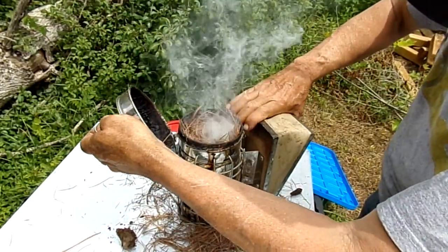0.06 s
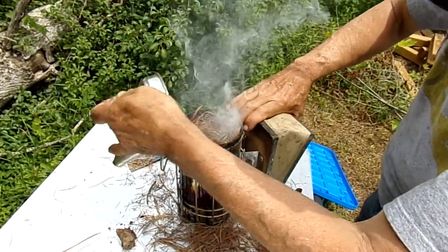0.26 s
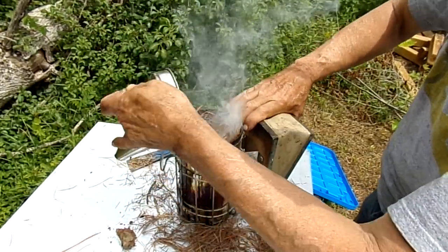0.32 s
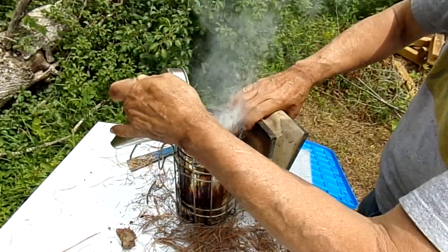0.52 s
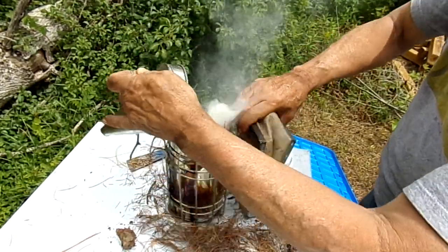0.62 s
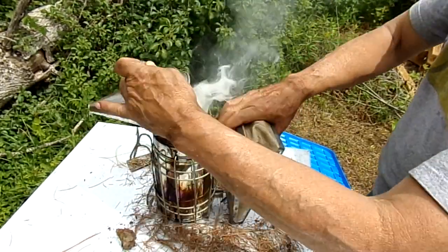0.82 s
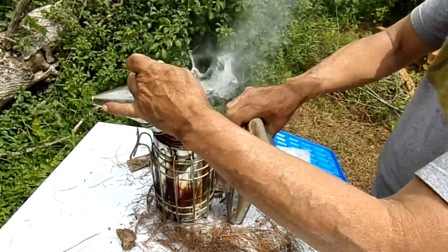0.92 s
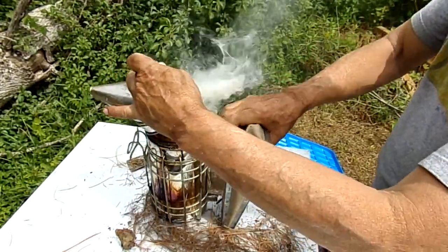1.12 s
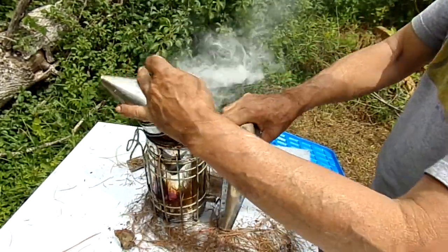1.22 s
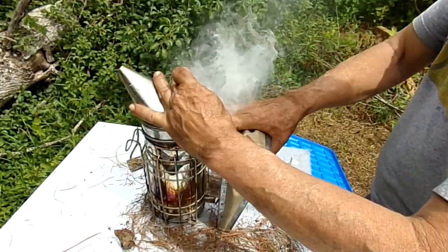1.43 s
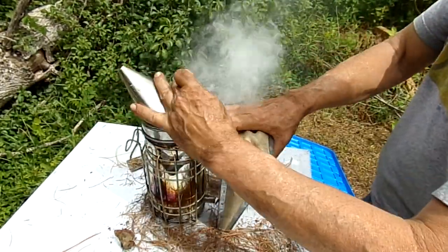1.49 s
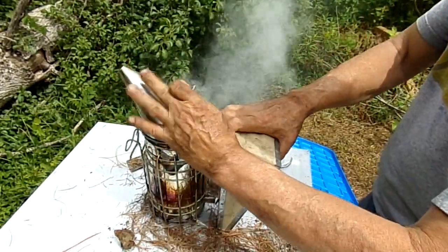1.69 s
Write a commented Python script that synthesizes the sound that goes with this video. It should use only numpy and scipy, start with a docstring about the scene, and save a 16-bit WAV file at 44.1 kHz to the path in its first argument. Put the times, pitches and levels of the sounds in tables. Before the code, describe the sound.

A hand bellows puffs three breathy bursts through a metal fire pot, drawing air back between them; a tin lid scrapes and clanks first, small ticks follow, close microphone, quiet yard with faint birds.

```python
"""A bee smoker is worked on a yard table. Filtered noise makes the hush of the yard, where gliding tones
chirp as small far birds; the hinge ticks as the lid is tilted, and the tin lid scrapes and clanks as
noise bursts over decaying modes. The hand bellows flaps softly in struck low tones, draws air back in
as gated noise, and between these breaths blows three puffs of resonant noise through the fire pot.
Late on, its air valve squeaks shut in a falling whistle."""
import sys
import numpy as np
from scipy.fft import rfft, irfft, next_fast_len
from scipy.io import wavfile
from scipy.ndimage import map_coordinates

SR = 44100
rng = np.random.default_rng(int(sys.argv[2]) if len(sys.argv) > 2 else 0)


def master_out(mix):
    """Clip the mix to full scale and print it as 16-bit PCM to the path in sys.argv[1]."""
    frames = np.transpose(np.atleast_2d(mix))
    ceiling = np.clip(frames, -1, 1)
    pcm = np.round(ceiling * 32767).astype(np.int16)
    wavfile.write(sys.argv[1], SR, pcm)


N = 77175  # samples, 1.75 s


def amp(db):
    """Logarithmic level: decibels to amplitude gain."""
    return 10 ** (np.asarray(db) / 20)


def unit(x):
    """Normalisation: scales the signal to rms 1."""
    return x / np.sqrt(np.mean(x ** 2) + 1e-20)


def since(start):
    """Causality: seconds elapsed since start, zero before it."""
    return np.maximum(np.arange(N) / SR - start, 0)


def filtered(x, response):
    """Linear filtering: multiplies the spectrum by a response of frequency."""
    size = next_fast_len(N + SR // 2)  # padded against wrap-around
    spectrum = rfft(x, size) * response(np.fft.rfftfreq(size, 1 / SR))
    return irfft(spectrum, size)[:N]


def coloured(x, points):
    """Spectral shaping: a curve through (Hz, dB) points on a log frequency axis, then rms 1."""
    f, db = np.transpose(points)
    return unit(filtered(x, lambda hz: amp(np.interp(np.log(hz + 1), np.log(f + 1), db))))


def noise(points):
    """Turbulence: fresh random noise of the given colour."""
    return coloured(rng.standard_normal(N), points)


def resonant(modes):
    """Cavity resonance: noise through squared second-order peaks (Hz, width in Hz at -6 dB, dB)."""
    def response(f):
        peaks = [amp(db) * abs(f * width / (centre * centre - f * f + 1j * f * width)) ** 2
                 for centre, width, db in modes]
        return sum(peaks)
    return unit(filtered(rng.standard_normal(N), response))


def wobble(rate):
    """Random modulation: a smooth curve through normal knots, rate of them a second."""
    return map_coordinates(rng.standard_normal(N // 10), [np.arange(N) * rate / SR], mode="wrap")


def swell(on, off, rise, fall):
    """Flow inertia: air builds and dies away smoothly, each edge at half strength at on and off."""
    t = np.arange(N) / SR
    opening = (1 + np.tanh((t - on) / rise / 2)) / 2
    closing = (1 - np.tanh((t - off) / fall / 2)) / 2
    return opening * closing


def struck(start, attack, t60):
    """Damped impact: quick attack and exponential decay, 60 dB in t60 seconds."""
    t = since(start)
    return (1 - np.exp(-t / attack)) * np.exp(-np.log(1000) * t / t60)


def tone(start, hz, attack, t60):
    """Modal vibration: one struck sine, slightly rough through random phase."""
    mode_rough = 0.45  # radians at each knot
    phase = 2 * np.pi * hz * since(start) + mode_rough * wobble(150)
    return struck(start, attack, t60) * np.sin(phase)


def glide(start, length, from_hz, to_hz, db, waver):
    """Frequency modulation: a short, slightly unsteady whistle on a straight pitch path."""
    u = np.minimum(since(start) / length, 1)
    hz = (from_hz + (to_hz - from_hz) * u) * (1 + waver * wobble(400))
    envelope = np.sqrt(2 * abs(np.sin(np.pi * u)))
    return amp(db) * envelope * np.sin(2 * np.pi * np.cumsum(hz) / SR)


def low_cut(x):
    """Radiation efficiency: small parts radiate almost no deep bass."""
    low_cut_hz = 150
    return filtered(x, lambda hz: 1 - 1 / (1 + (hz / low_cut_hz) ** 6))


# Spectrum of the yard's hush. Each row: frequency in Hz, level in dB.
YARD_SPECTRUM = [(25, -42), (70, -18), (110, -14.5), (170, -2), (330, -1.5), (600, -8), (1000, -14),
                 (1250, -7), (2100, -12), (3800, -13.5), (5300, -9.5), (8000, -28), (10500, -20.5),
                 (13200, -17.5), (15500, -34)]
# Notes of the far birds. Each row: start in seconds, length in seconds, first pitch in Hz,
# last pitch in Hz, level in dB before the flutter.
BIRD_NOTES = [(.08, 0.018, 5450, 5400, -53), (.112, .02, 5450, 5300, -51.5),
              (0.148, 0.022, 5500, 5350, -50.5), (0.319, 0.016, 5400, 5480, -49.5),
              (0.355, 0.045, 3250, 2930, -50.5), (.384, 0.014, 5500, 5400, -49.5),
              (.772, .016, 5480, 5420, -47.5), (1.466, .016, 6100, 5850, -54),
              (1.502, 0.024, 6150, 5300, -54), (1.536, 0.026, 6250, 5400, -53.5)]
YARD_DB, YARD_SWAY_DB, CHIRP_FLUTTER_DB = -49.5, .8, 3


def yard():
    """Ambient field and scattering: a swaying hush, and far birds' notes broken by the foliage."""
    hush = amp(YARD_DB + YARD_SWAY_DB * wobble(11.6)) * noise(YARD_SPECTRUM)
    birds = sum(glide(*row, waver=0.02) for row in BIRD_NOTES)
    flutter = amp(CHIRP_FLUTTER_DB * np.tanh(wobble(200)))
    return hush + birds * flutter


# Spectrum of a bright metal click, also heard in the lid. Each row: frequency in Hz, level in dB.
CLICK_SPECTRUM = [(1000, -25), (5000, -6.5), (8500, -19), (11000, -5.5), (13000, -3), (15500, -18.5)]
# Slips of the hinge. Each row: start in seconds, level in dB.
HINGE_SLIPS = [(.131, -37), (.437, -37), (1.265, -33), (1.431, -25.5), (1.4882, -25.5), (1.73, -40)]
HINGE_HZ, HINGE_DB = 12840, 1  # the hinge's own ring, dB relative to the slip
TICK_ATTACK_S, TICK_T60_S = 0.00071, 0.0095


def ticks():
    """Stick-slip: each slip of the hinge gives a bright click and a very short ring."""
    bright = noise(CLICK_SPECTRUM)
    out = np.zeros(N)
    for start, db in HINGE_SLIPS:
        click = bright * struck(start, TICK_ATTACK_S, TICK_T60_S)
        hinge = amp(HINGE_DB) * tone(start, HINGE_HZ, TICK_ATTACK_S, TICK_T60_S)
        out += amp(db) * (click + hinge)
    return out


CONTACT_S = 0.0011  # attack of a tin contact
# Modes of the tin. Each row: frequency in Hz, level in dB, 60 dB decay time in seconds.
TIN_MODES = [(1206, -1, .05), (1560, -5, .035), (2540, -9, .03), (3198, -7, .05), (5416, -11, .035)]


def ring(start):
    """Modal superposition: the tin's modes, in a new random balance at every blow."""
    return sum(amp(db + rng.normal(0, 1.5)) * tone(start, hz, CONTACT_S, t60)
               for hz, db, t60 in TIN_MODES)


# Spectrum of the tin's scrape. Each row: frequency in Hz, level in dB.
SCRAPE_SPECTRUM = [(100, 6), (300, 11), (700, -4.5), (1300, -3), (1900, -0.5), (2600, -0.5), (3900, -10),
                   (5500, -11), (8000, -18), (15000, -19)]
# Knocks of the tin lid and pot. Each row: start in seconds, level in dB, bright part in dB
# relative to that level, 60 dB decay time in seconds.
TIN_KNOCKS = [(0.2134, -25.5, -10, 0.02), (0.2198, -29.5, -4.5, 0.033), (0.2253, -20, -12, 0.019),
              (0.2346, -24, 0, 0.03), (0.2409, -18, 3.5, 0.021), (0.2458, -28.5, -6.5, 0.11),
              (0.605, -24.5, 10.5, 0.015), (0.792, -33, 6.5, 0.026), (0.952, -29, -5, 0.042),
              (1.044, -41, 8.5, 0.086), (1.0751, -29.5, 7, 0.031), (1.168, -28.5, -21, 0.027),
              (1.6791, -29.5, -2.5, 0.014), (1.6835, -30.5, -5, 0.011), (1.713, -43, -1, 0.12)]
# Short notes where the tin catches and clacks. Each row: start in seconds, pitch in Hz, level in dB.
TIN_CLACKS = [(.2255, 1150, -23), (.2345, 2560, -12), (.236, 5300, -19), (.517, 1240, -17.5),
              (.5175, 1650, -16.5)]
RING_DB, GRIT_DB = -7.5, 5  # ring relative to its knock; greatest swing of the grit either way
CLANK_S, CLANK_WIDTH_S = .2444, .0010  # centre and 1/e half-width of the clank
CLANK_DB, CLANK_RING_DB = -19.5, -22  # the rim hits home: its crack and its ring
CLACK_ATTACK_S, CLACK_T60_S = .004, .03


def lid():
    """Friction and impact: short gritty scrapes ring the hand-damped tin, which clacks where it catches."""
    grit = amp(GRIT_DB * np.tanh(wobble(1200)))
    body = unit(noise(SCRAPE_SPECTRUM) * grit)
    bright = noise(CLICK_SPECTRUM)
    crack = np.exp(-((since(0) - CLANK_S) / CLANK_WIDTH_S) ** 2) * bright
    out = amp(CLANK_DB) * crack + amp(CLANK_RING_DB) * ring(CLANK_S)
    for start, db, treble_db, t60 in TIN_KNOCKS:
        scrape = struck(start, CONTACT_S, t60) * (body + amp(treble_db) * bright)
        out += amp(db) * (scrape + amp(RING_DB) * ring(start))
    for start, hz, db in TIN_CLACKS:
        out += amp(db) * tone(start, hz, CLACK_ATTACK_S, CLACK_T60_S)
    return out


# Flaps of the bellows' folds. Each row: start in seconds, pitch in Hz, level in dB,
# 60 dB decay time in seconds.
FOLD_FLAPS = [(0.2449, 275, -14, 0.023), (0.244, 165.3, -15.5, 0.11), (.583, 233, -28, 0.22),
              (0.611, 159, -30, 0.13), (0.674, 169, -28, 0.12), (0.921, 176, -30, 0.13),
              (0.953, 179, -28, 0.11), (1.045, 217, -26, 0.08), (1.164, 158.3, -21, 0.085),
              (1.286, 206, -34, 0.083), (1.354, 209, -34, 0.083), (1.632, 187, -30.5, 0.065)]
FLAP_ATTACK_S = 0.0028


def flaps():
    """Membrane vibration: the folds of the bellows flap in soft, low, damped thumps."""
    return sum(amp(db) * tone(start, hz, FLAP_ATTACK_S, t60) for start, hz, db, t60 in FOLD_FLAPS)


# Spectrum of the air rushing in. Each row: frequency in Hz, level in dB.
INTAKE_SPECTRUM = [(76, -55), (130, -3.5), (330, -1), (1060, -6.5), (1310, 0.5), (3320, -9.5),
                   (3680, -13.5), (4160, -9), (6730, -16.5), (8000, -25), (10400, -67)]
# Spectrum of the valve's hiss, also the colour of the crackle. Each row: frequency in Hz, level in dB.
HISS_SPECTRUM = [(4000, -26), (6500, -5), (8300, -21), (10300, 1.5), (11700, -5), (13000, 3), (15500, -16)]
# Breaths drawn back in. Each row: half up in seconds, half down in seconds, rush in dB, hiss in dB.
BREATHS = [(0.37, 0.466, -43.5, -56.5), (0.476, 0.505, -36.5, -39.5), (0.66, 0.748, -38.5, -37),
           (0.784, 0.81, -35, -41.5), (0.934, 1.092, -42, -40), (1.232, 1.32, -55.5, -44.5),
           (1.165, 1.48, -50, -53.5)]
INTAKE_RISE_S, INTAKE_FALL_S = 0.011, 0.014


def intakes():
    """Turbulent inflow: the bellows refills with a softer rush and a thin hiss at the valve."""
    rush = noise(INTAKE_SPECTRUM) * amp(1.4 * wobble(59.97))
    hiss = noise(HISS_SPECTRUM) * amp(1.2 * wobble(150))
    out = np.zeros(N)
    for on, off, rush_db, hiss_db in BREATHS:
        flow = swell(on, off, INTAKE_RISE_S, INTAKE_FALL_S)
        out += flow * (amp(rush_db) * rush + amp(hiss_db) * hiss)
    return out


# Spectrum of the blown air. Each row: frequency in Hz, level in dB.
PUFF_SPECTRUM = [(71, -57), (120, -21), (212, -13), (367, 0.5), (552, -14.5), (846, -9.5), (917, -18.5),
                 (1590, -5), (2290, -8), (3300, -8), (3660, -7), (4670, -9), (8080, -19), (12900, -9),
                 (15500, -33)]
# Air modes of the fire pot. Each row: frequency in Hz, width in Hz at -6 dB, level in dB.
POT_MODES = [(808, 270, -4), (1250, 170, -1), (1614, 110, 3), (2516, 47, -4.5), (3320, 124, -3.5),
             (4040, 780, -9.5)]
# Squeezes of the bellows. Each row: half up in seconds, half down in seconds, rise in seconds,
# fall in seconds, level in dB, boom pitch in Hz, boom level in dB.
SQUEEZES = [(0.515, 0.625, .014, 0.021, -27, 230, -40), (0.827, 0.916, 0.0088, 0.011, -27, 354, -35.5),
            (1.106, 1.164, 0.013, 0.02, -28, 307, -39.5)]
# The nozzle singing in the second puff. One row: start in seconds, length in seconds,
# first pitch in Hz, last pitch in Hz, level in dB.
NOZZLE_WHISTLE = (.852, .08, 830, 890, -37)
POT_DB, BOOM_WIDTH_HZ = -6, 91
TREBLE_GROWS = 1.46  # exponent of flow for the treble
FLUTTER_DB, GUST_DB = 0.66, 1.8  # dB per unit of wobble; the body flutters more than its hiss
CRACKLE_PER_S, CRACKLE_DB = 470, -6  # dry fuel in the draught, dB relative to the puff


def puffs():
    """Turbulence and resonance: air rushes through fuel, brighter with flow, sounding pot and bellows."""
    air = low_cut(noise(PUFF_SPECTRUM))
    low = filtered(air, lambda hz: 1 / (1 + (hz / 3500) ** 2))
    treble = air - low
    pot = amp(POT_DB) * resonant(POT_MODES)
    gusts = amp(GUST_DB * wobble(110))
    snaps = (rng.random(N) < CRACKLE_PER_S / SR) * rng.standard_normal(N)
    crackle = amp(CRACKLE_DB) * coloured(snaps, HISS_SPECTRUM)
    out = np.zeros(N)
    for on, off, rise, fall, db, boom_hz, boom_db in SQUEEZES:
        flow = swell(on, off, rise, fall)
        body = flow * (gusts * (low + pot) + crackle)
        out += amp(db) * (body + flow ** TREBLE_GROWS * treble)
        out += amp(boom_db) * flow * resonant([(boom_hz, BOOM_WIDTH_HZ, 0)])
    return out * amp(FLUTTER_DB * wobble(130)) + glide(*NOZZLE_WHISTLE, waver=0.0048)


# Path of the squeak as the air valve shuts. Each row: time in seconds, pitch in Hz,
# level in dB, both before random wavering.
VALVE_SQUEAK = [(1.284, 13550, -52), (1.315, 13000, -39.5), (1.336, 12150, -58), (1.356, 10400, -48),
                (1.386, 8950, -62)]


def squeak():
    """Frequency modulation: a thin, wavering, falling whistle as the air valve shuts."""
    t = np.arange(N) / SR
    times, hz, db = np.transpose(VALVE_SQUEAK)
    pitch = np.interp(t, times, hz) * (1 + .007 * wobble(600))
    level = amp(np.interp(t, times, db) + 2.5 * wobble(200))
    sounding = (t > times[0]) * (t < times[-1])
    return sounding * level * np.sin(2 * np.pi * np.cumsum(pitch) / SR)


def scene():
    """Superposition: the smoker close by, the yard behind."""
    metal_and_folds = low_cut(ticks() + lid() + flaps())
    return (yard() + metal_and_folds + intakes() + puffs() + squeak())[None]


# Narrow notches of the microphone. Each row: frequency in Hz, width in Hz at -6 dB.
NOTCHES = [(3710, 240), (7850, 276), (11750, 370)]
TOP_HZ = 15800  # band limit


def record(dry):
    """Transducer response: the microphone has three narrow notches and a band limit."""
    def response(f):
        notches = [(f - hz) ** 2 / ((f - hz) ** 2 + (width / 2) ** 2) for hz, width in NOTCHES]
        return np.prod(notches, axis=0) * (f < TOP_HZ)
    return filtered(dry[0], response)[None]


dry = scene()
out = record(dry)
master_out(out)
```